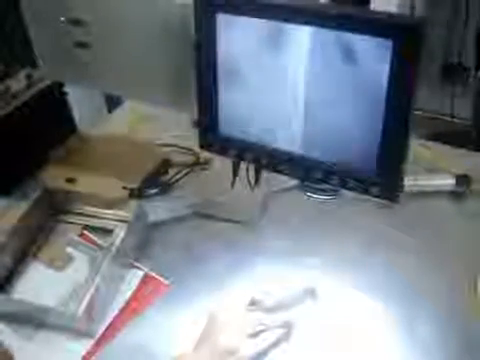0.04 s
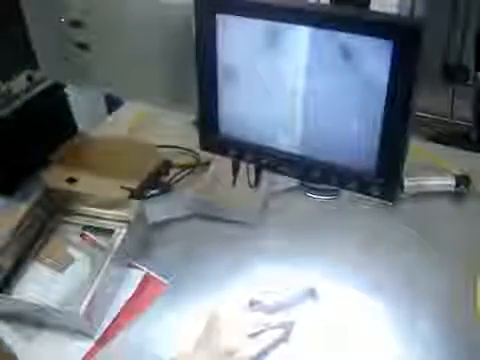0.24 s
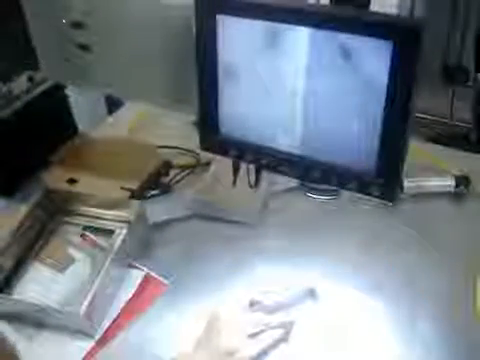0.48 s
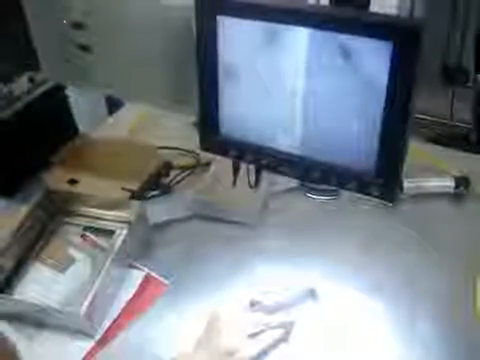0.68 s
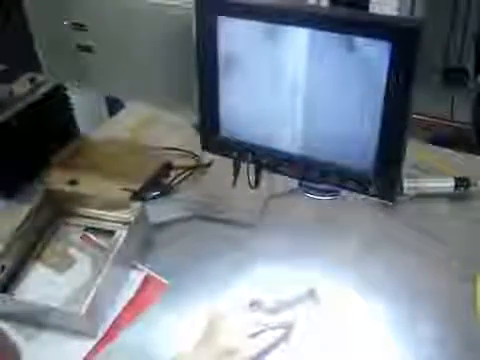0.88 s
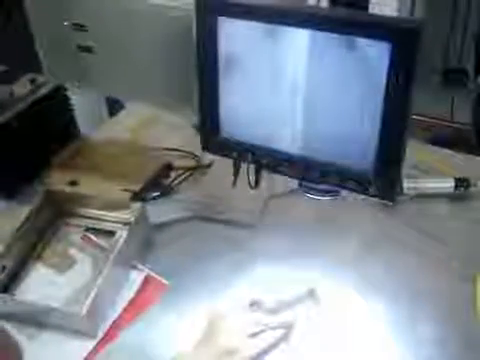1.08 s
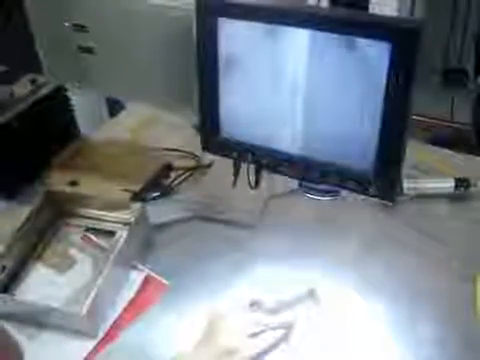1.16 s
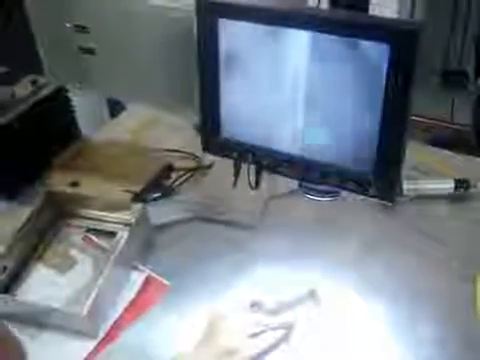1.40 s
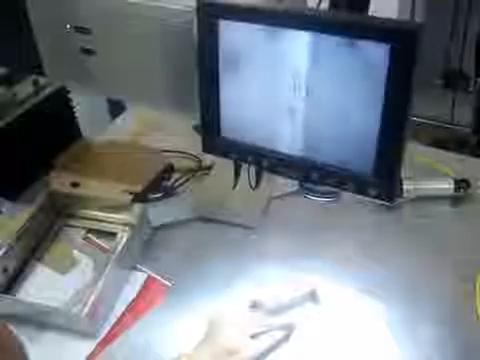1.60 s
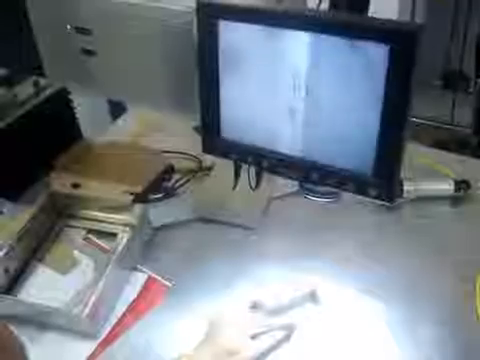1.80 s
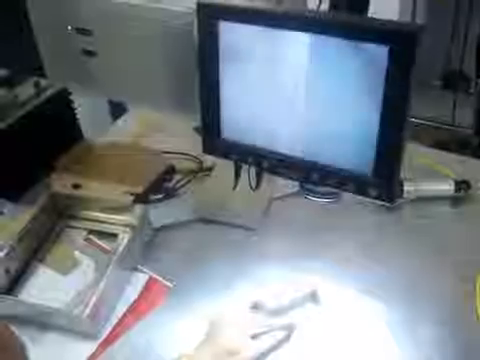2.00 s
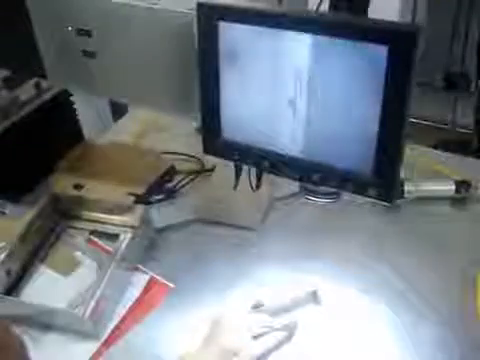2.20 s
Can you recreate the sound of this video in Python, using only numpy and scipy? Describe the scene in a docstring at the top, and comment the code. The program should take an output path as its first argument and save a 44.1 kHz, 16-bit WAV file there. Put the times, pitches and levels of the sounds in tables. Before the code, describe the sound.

In an echoing workshop, a laser welder ticks rapidly, then something heavy like sheet metal lands with a thump and rattling crash. Two more short runs of ticks follow, with sizzling and a swelling drone, while a fan whirrs throughout.

```python
"""A cooling unit whirrs and a laser welder ticks: three short runs, about 15 shots a second.
Each shot is a sharp tick and, a moment later, a dull knock. The hot metal sizzles, and the
machine drones louder under load. Just after the first run something heavy, probably a sheet-metal
panel, lands with a thump and a crash that fill the hard-walled workshop."""
import sys
import numpy as np
from scipy import signal
from scipy.fft import rfft, irfft
from scipy.io import wavfile

SR = 44100
rng = np.random.default_rng(int(sys.argv[2]) if len(sys.argv) > 2 else 0)


def unload_audio(sound):
    """Save the sound as a 16-bit wav file, at the path given as the first command line argument."""
    columns = np.transpose(np.atleast_2d(sound))
    # keep every value between -1 and 1, then stretch to whole-number steps
    steps = np.round(np.clip(columns, -1, 1) * 32767)
    wavfile.write(sys.argv[1], SR, steps.astype(np.int16))


N = 99225
TIME = np.arange(N) / SR

# the fan's colour, meaning how strong its noise is from low to high (f/Hz, level/dB)
FAN_COLOUR = [(25, -45), (60, -19), (100, -8), (200, -4.5), (300, -0.5), (450, -6), (580, -7), (780, -2),
              (1050, -8.5), (1400, -10.5), (2200, -14.5), (3300, -19), (5000, -24), (8000, -31.5),
              (10000, -37.5)]
# steady tones of the cooling unit (f/Hz, level/dB)
COOLER_TONES = [(301, -50.5), (408, -53), (483, -54.5), (650, -49.5), (693, -51), (794.5, -42),
                (894, -51.5)]
# pitches the machine drones at (f/Hz, width/Hz, level/dB)
DRONE_BANDS = [(403.2, 16, 4.5), (470, 44, -0.5), (525, 20, 1.5), (695, 14, -1.5), (740, 96, 3.5)]
# how the drone swells under load (t/s, level/dB)
DRONE_LOUDNESS = [(0, -35.5), (.22, -35.5), (.6, -51), (1.28, -54), (1.36, -34), (1.56, -36), (1.8, -52),
                  (1.88, -39.5), (1.97, -36), (2.25, -38)]
# how the hiss around the weld comes and goes (t/s, level/dB)
HISS_LOUDNESS = [(0, -34.5), (.2, -38.5), (.6, -49), (1.27, -76), (1.32, -32.5), (1.5, -40), (1.65, -43.5),
                 (1.84, -65), (1.92, -37), (2.1, -39), (2.17, -30.5), (2.25, -37)]
# colour of that hiss (f/Hz, level/dB)
HISS_COLOUR = [(100, -14), (500, -5), (1200, 2), (1700, -3), (2200, -2.5), (3300, -5), (6000, -13.5),
               (10000, -13.5)]
# laser shots (t/s, tick/dB, treble/dB, pitch/Hz, crack/dB, knock/dB, knock delay/s, air push/dB)
LASER_SHOTS = [(0.0177, -9, -19, 1766, -18.5, -14.5, 0.01, -38),
               (0.0836, -8, -19, 2070, -19.5, -20, 0.014, -22),
               (0.1504, -15, -18.5, 1980, -23, -19, 0.01, -36),
               (1.3064, -8, -9.5, 2000, -18, -15, 0.012, -19.5),
               (1.3720, -16, -13.5, 2000, -14, -18, 0.01, -19),
               (1.4399, -11.5, -16.5, 2080, -23, -18.5, 0.011, -20),
               (1.5063, -23.5, -15.5, 2090, -19.5, -18.5, 0.012, -24),
               (1.8839, -11.5, -13, 1960, -29, -15.5, 0.00997, -27),
               (1.9506, -12, -20, 1930, -19, -16, 0.0087, -39),
               (2.0166, -18, -13.5, 1956, -27, -19.5, 0.0087, -35),
               (2.0838, -17, -17.5, 2120, -23, -20, 0.012, -38)]
# ringing tones of a tick (f/Hz, level/dB, ring time/s); a ring time is the time to fade by 60 dB
TICK_TONES = [(1370, -9, 0.011), (2007, 3, 0.0087), (2910, -6.5, 0.006), (4690, -6.5, 0.01),
              (6190, -7, 0.017), (7370, -8, 0.0077), (9150, -14, 0.022), (9750, -13, 0.035)]
# colour of a spark's crack (f/Hz, level/dB)
SPARK_COLOUR = [(20, -3), (150, -5.5), (1000, 3.5), (3000, -2.5), (5500, -7.5), (7000, -11), (8200, -5),
                (9700, -4.5)]
# the two pulses of a knock (head start/s, f/Hz, half length/s, level/dB)
KNOCK_PULSES = [(.003, 760, 0.0012, -2.5), (0, 770, .001, -6)]
# spurts from the hot metal (t/s, hold/s, level/dB, f/Hz, width/Hz)
SIZZLE_SPURTS = [(0.035, 0.28, -61, 5200, 2850), (0.174, 0.011, -34.5, 5300, 2800),
                 (0.981, 0.054, -47.5, 3400, 696), (1.307, 0.0086, -29.5, 6750, 546),
                 (1.31, 0.14, -51, 5230, 2500), (1.377, .014, -35.5, 6700, 450),
                 (1.344, 0.15, -47.5, 6900, 700), (1.563, 0.028, -37.5, 5860, 2380),
                 (1.62, .15, -54.5, 8150, 690), (1.617, 0.36, -51, 5470, 1980),
                 (1.884, 0.13, -33.5, 4500, 597), (1.912, 0.11, -35.5, 5680, 650),
                 (2.031, 0.061, -37.5, 5000, 1700), (2.11, .14, -39.5, 6200, 400)]
# the panel's dull first blow (level/dB, hold/s, fall/s)
THUMP_SHAPE = (-13.5, 0.049, 0.022)
# colour of the thump (f/Hz, level/dB)
THUMP_NOISE = [(25, -40), (80, -27), (130, -11), (220, -5.5), (330, 0), (700, -4.5), (1300, -10),
               (3000, -15.5), (4500, -28.5), (10000, -37)]
# ringing tones of the panel (f/Hz, level/dB, ring time/s)
PANEL_TONES = [(136.1, -11.5, 1.13), (192, -11, 1.2), (310.2, 0.5, 0.72), (546, -7.5, 1.42), (735, -7, 1.2),
               (966, -19.5, 2.2), (1028, -9.5, 1.36), (1178, -10.5, 0.84), (1232, -17.5, 1.9)]
# the crash that follows (level/dB, rise/s, hold/s, fall/s)
CRASH_SHAPE = (-7, 0.0119, 0.0245, 0.07)
# colour of the crash (f/Hz, level/dB)
CRASH_NOISE = [(25, -26), (70, -11.5), (200, -4.5), (450, 0.5), (1100, 1), (2000, -6.5), (3200, -12),
               (4500, -21), (7000, -28.5), (10000, -32.5)]
# bright rattle that builds up in the crash (level/dB, rise/s, hold/s, fall/s)
RATTLE_SHAPE = (-17, 0.0417, .015, 0.1076)
# colour of the rattle (f/Hz, level/dB)
RATTLE_NOISE = [(25, -3.5), (60, 0), (200, -28), (1000, 2.5), (2000, 4), (3500, -9), (5000, -8), (7000, -9),
                (10000, -19.5)]
# how long the workshop echoes (f/Hz, ring time/s)
ECHO_TIMES = [(30, .4), (100, 0.97), (250, 1.14), (700, 1.07), (1500, 0.84), (3000, 0.97), (5500, 0.56),
              (9000, 0.48)]

TICK_BASE_HZ, TREBLE_FROM_HZ, TICK_RISE_S = 2000, 4000, .0009
THUMP_AT_S, CRASH_AT_S, RATTLE_AT_S, PANEL_RISE_S = .235, .294, .3, .017


def amp(db):
    """Turns decibels into a number to multiply by."""
    return 10 ** (np.asarray(db) / 20)


def unit(x):
    """Scales a sound to an average strength (rms) of 1."""
    return x / np.sqrt(np.mean(x ** 2) + 1e-20)


def look_up(points, hz):
    """Reads between a table's rows, with frequencies spaced by octaves."""
    f, value = np.transpose(points)
    return np.interp(np.log(hz + 1), np.log(f + 1), value)


def loudness(points):
    """A volume curve through (t/s, level/dB) points."""
    return amp(np.interp(TIME, *np.transpose(points)))


def noise(colour):
    """Noise with the given colour."""
    gain = amp(look_up(colour, np.fft.rfftfreq(N, 1 / SR)))
    return unit(irfft(rfft(rng.standard_normal(N)) * gain, N))


def band(hz, width):
    """Noise around one pitch; around 0 Hz it is a random wobble."""
    f = np.fft.rfftfreq(N, 1 / SR)
    return unit(irfft(rfft(rng.standard_normal(N)) / (1 + ((f - hz) / width) ** 2), N))


def envelope(start, rise, hold, fall):
    """A volume curve that climbs, holds and dies away."""
    t = TIME - start
    return np.clip(t / rise, 0, 1) * np.exp(-np.maximum(t - rise - hold, 0) / fall)


def ring(start, tones, rise):
    """Struck metal: tones start together and each fades at its own pace."""
    first, length = round(start * SR), round(max(tone[2] for tone in tones) * SR)
    t = np.maximum(TIME - start, 0)[first:first + length]
    sound = sum(amp(db - 60 * t / ring_s) * np.sin(2 * np.pi * (hz * t + rng.random()))
                for hz, db, ring_s in tones)
    return np.pad(sound * np.minimum(t / rise, 1), (first, N))[:N]


def echo(sound):
    """Hard walls smear a sound into a tail; the treble dies before the middle pitches."""
    hz, t, spectrum = signal.stft(rng.standard_normal(N), SR, nperseg=256)
    fade = amp(-60 * t / look_up(ECHO_TIMES, hz)[:, None])
    tail = signal.istft(spectrum * fade, SR, nperseg=256)[1][:N]
    tail *= np.minimum(TIME / .017, 1)
    return signal.fftconvolve(sound, tail / np.linalg.norm(tail))[:N]


def cooling_unit(waver_hz=.8):
    """The fan rushes, with wavering tones and a faint airy whistle."""
    whirr = amp(-36) * noise(FAN_COLOUR)
    for hz, db in COOLER_TONES:
        pitch = hz + waver_hz * band(0, 11)
        whirr += amp(db) * unit(np.sin(2 * np.pi * np.cumsum(pitch) / SR))
    return whirr + amp(-60) * band(hz=8850, width=300)


def machine_drone():
    """The machine drones louder under the load of each run."""
    drone = unit(sum(amp(db) * band(hz, width) for hz, width, db in DRONE_BANDS))
    return loudness(DRONE_LOUDNESS) * drone


def weld_hiss():
    """A broad hiss around the weld sinks away between runs."""
    return loudness(HISS_LOUDNESS) * noise(HISS_COLOUR)


def laser_shots():
    """Each shot makes a ringing tick, a spark's crack, a small push of air and a double knock."""
    ticks, knocks, pushes = np.zeros((3, N))
    spark = noise(SPARK_COLOUR)
    for start, tick_db, treble_db, pitch, crack_db, knock_db, delay, push_db in LASER_SHOTS:
        # only the lower tones follow the shot's pitch
        tones = [(hz * pitch / TICK_BASE_HZ, db + tick_db, ring_s) if hz < TREBLE_FROM_HZ
                 else (hz, db + treble_db, ring_s) for hz, db, ring_s in TICK_TONES]
        ticks += ring(start, tones, TICK_RISE_S)
        ticks += amp(crack_db) * spark * envelope(start, TICK_RISE_S, hold=0, fall=.0035)
        push_age = np.maximum(TIME - start, 0) / .0012  # the push peaks after 1.2 ms
        pushes += amp(push_db) * push_age * np.exp(-push_age)
        for head_start, hz, half_length, db in KNOCK_PULSES:
            t = TIME - start - delay + head_start
            bell_curve = np.exp(-np.minimum(abs(t / half_length), 10) ** 2)
            knocks += amp(knock_db + db) * bell_curve * np.cos(2 * np.pi * hz * t)
    return ticks + knocks + pushes + echo(amp(-15.5) * ticks + amp(-2) * knocks)


def sizzle(grain_db=1.5):
    """The hot metal gives off grainy, half-whistling spurts."""
    spurts = sum(amp(db) * band(hz, width) * envelope(start, rise=.006, hold=hold, fall=.018)
                 for start, hold, db, hz, width in SIZZLE_SPURTS)
    flicker = unit(amp(grain_db * band(0, 130)))
    return spurts * flicker


def blow(start, shape, colour):
    """One hit of the panel is a burst of noise."""
    db, rise, hold, fall = shape
    return amp(db) * noise(colour) * envelope(start, rise, hold, fall)


def falling_panel(thump_rise_s=.016):
    """A dull thump, then a bright, rattling crash fills the room; the panel rings on."""
    db, hold, fall = THUMP_SHAPE
    blows = blow(THUMP_AT_S, (db, thump_rise_s, hold, fall), THUMP_NOISE)
    blows += blow(CRASH_AT_S, CRASH_SHAPE, CRASH_NOISE)
    blows += blow(RATTLE_AT_S, RATTLE_SHAPE, RATTLE_NOISE)
    upper_tones = [(hz, db, ring_s) for hz, db, ring_s in PANEL_TONES if hz > 400]
    ringing = amp(-11) * ring(THUMP_AT_S, PANEL_TONES, PANEL_RISE_S)
    ringing += amp(-25) * ring(CRASH_AT_S, upper_tones, PANEL_RISE_S)
    return blows + amp(-3) * echo(blows) + ringing


def scene():
    """All the sounds meet at one microphone."""
    return (cooling_unit() + machine_drone() + weld_hiss() + laser_shots() + sizzle()
            + falling_panel())[None]


def record(dry, ceiling=.92, top_hz=10120):
    """Gently squashes the loudest peaks, then cuts off the highest treble."""
    squashed = ceiling * np.tanh(dry / ceiling)
    treble_cut = signal.firwin(601, top_hz, window=("kaiser", 8), fs=SR)
    return signal.oaconvolve(squashed, treble_cut[None], "same")


dry = scene()
out = record(dry)
unload_audio(out)
```